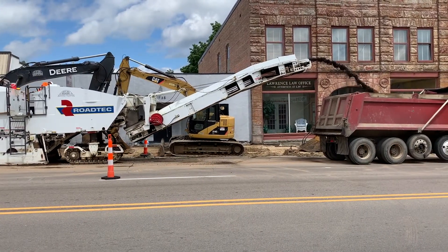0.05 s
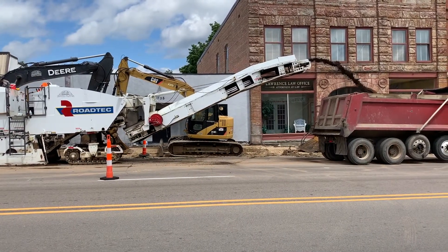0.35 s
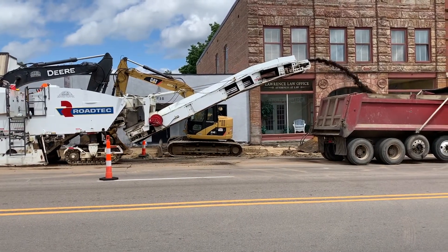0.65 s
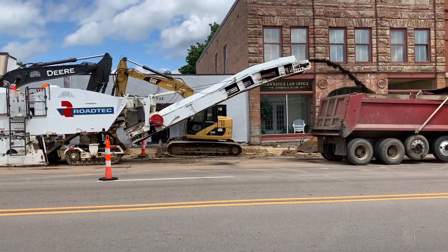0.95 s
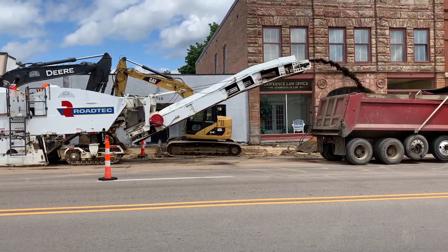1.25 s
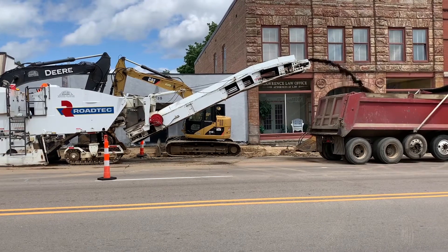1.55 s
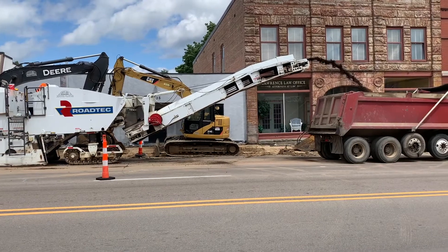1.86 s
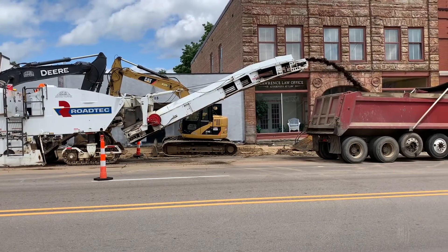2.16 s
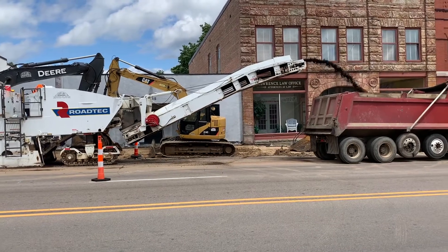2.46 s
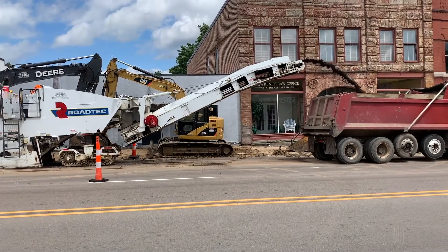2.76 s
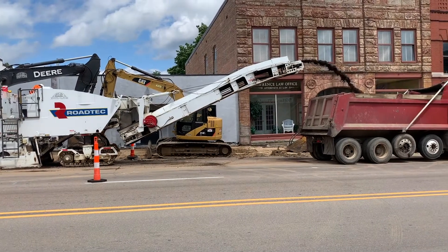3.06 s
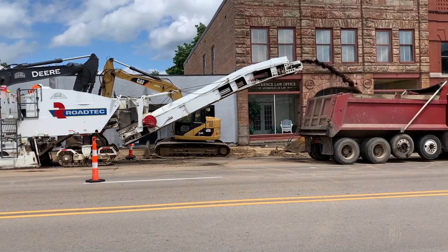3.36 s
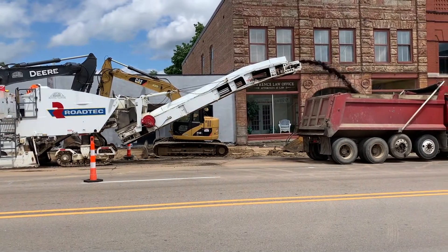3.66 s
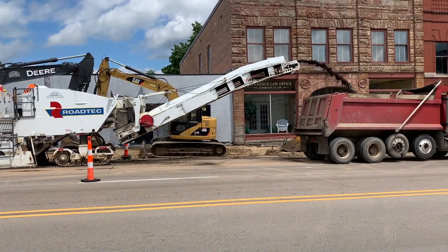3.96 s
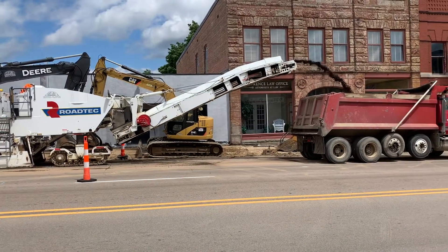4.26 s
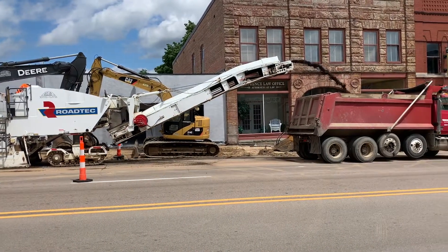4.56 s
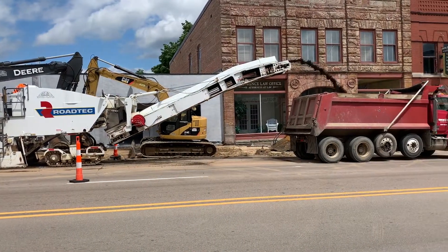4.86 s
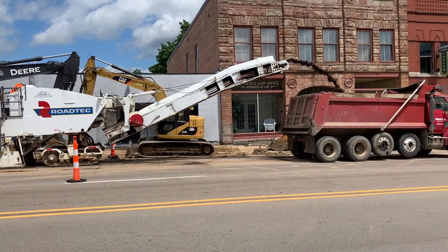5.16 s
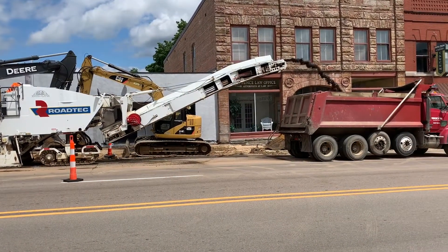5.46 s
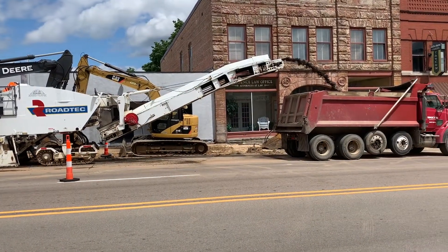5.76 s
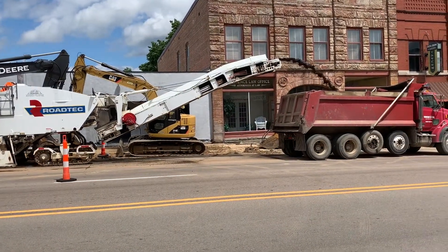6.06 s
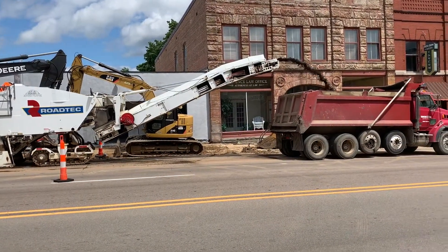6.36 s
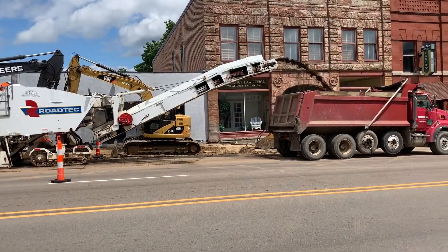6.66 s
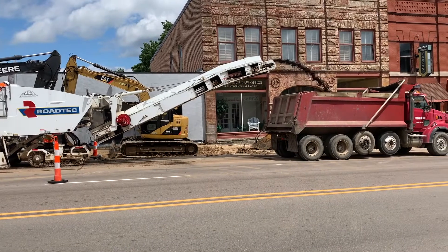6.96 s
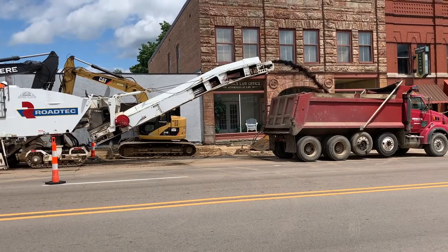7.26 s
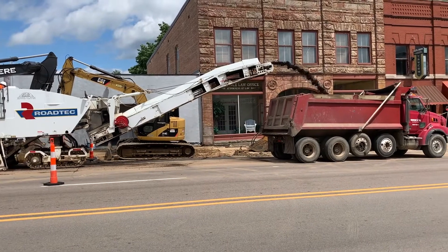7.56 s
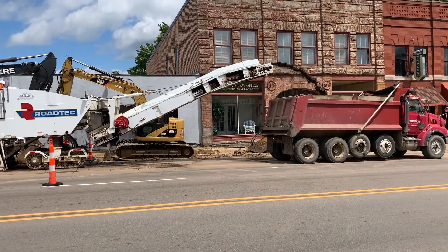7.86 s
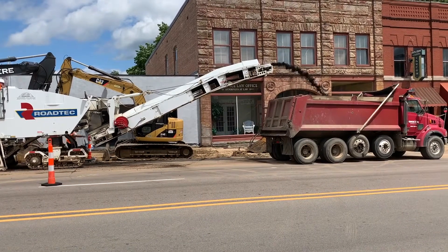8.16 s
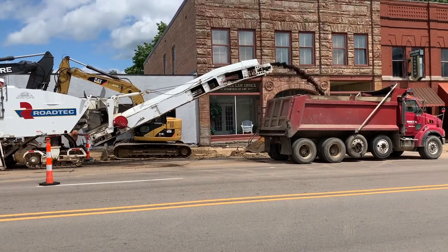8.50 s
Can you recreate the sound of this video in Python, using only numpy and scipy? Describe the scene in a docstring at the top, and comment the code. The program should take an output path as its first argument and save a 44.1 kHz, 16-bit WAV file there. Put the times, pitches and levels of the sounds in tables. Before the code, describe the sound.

A road milling machine grinds asphalt with a loud, steady roar over a droning diesel engine, while grit hisses into a dump truck.

```python
"""A road milling machine creeps along a town street, on the left of a two-port microphone at the far kerb.
Its governed diesel drones in periodic firing pulses, louder under load, over an exhaust rumble. The drum
chips asphalt, countless impacts merging into a roar; slabs thud, steel rings and the crawlers squeak.
On the right, millings pour off the conveyor into a dump truck: a gritty hiss with a few sharp spits."""
import sys
import numpy as np
from scipy import signal
from scipy.fft import rfft, irfft
from scipy.io import wavfile
from scipy.ndimage import uniform_filter1d

SR = 44100
rng = np.random.default_rng(int(sys.argv[2]) if len(sys.argv) > 2 else 0)


def waveform_to_disk(signal):
    """Save audio, clipped to [-1, 1], as 16-bit WAV at the path in sys.argv[1]."""
    frames = np.transpose(np.atleast_2d(signal))
    scaled = np.clip(frames, -1, 1) * 32767
    samples = np.round(scaled).astype(np.int16)
    wavfile.write(sys.argv[1], SR, samples)


N = 384993
TIME, HZ = np.arange(N) / SR, np.fft.rfftfreq(N, 1 / SR)
TURNS_PER_S, FIRINGS_PER_TURN = 36.11, 3  # governed crankshaft
# earlier arrival at the left port: (frequency [Hz], lead [ms])
MACHINE_LEAD = [(300, 0.309), (400, 0.268), (700, 0.292), (1050, 0.213), (1330, 0.362), (1500, 0.302),
                (1800, 0.327), (2200, 0.459), (2900, 0.515), (3500, 0.505), (4500, 0.505), (5000, 0.48),
                (7000, 0.49)]
TRUCK_LEAD_MS = -.217


def diesel(turns, effort_db, firing_db=-20.0, knock_db=-39, order_growth=0.19):
    """Periodic combustion radiates a line spectrum: the firing tone and other orders grow with effort."""
    # engine orders: (multiple of crankshaft speed [1]) and, for each, (level at 0 dB effort [dB])
    multiples = [1.5, 3.5, 5.5, 6, 6.5, 7, 9, 14.5, 19.5, 21, 29, 30, 37.5]
    order_levels = [-39, -37, -41, -35, -35.5, -34, -35, -41.5, -45.5, -45.5, -49, -42.5, -42]
    # pumps, fans and the truck's engine: (frequency [Hz], level [dB])
    hum_lines = [(60.6, -33), (117.1, -30), (172.3, -32), (598.2, -45), (851, -48), (890, -45), (1031, -52),
                 (1361, -50), (1734, -47)]
    firing = tone(FIRINGS_PER_TURN * turns, firing_db + effort_db, waver=0.08)
    orders = sum(tone(k * turns, db, waver=0.17) for k, db in zip(multiples, order_levels))
    orders *= amp(order_growth * effort_db)
    hums = sum(tone(hz * TIME, db, waver=0.3) for hz, db in hum_lines)
    # the knock pattern repeats every two turns
    knock_hz = np.arange(2049) * TURNS_PER_S / 2
    phases = np.exp(2j * np.pi * rng.random(len(knock_hz)))
    cycle = irfft(phases * knock_hz / (1 + (knock_hz / 750) ** 3))
    knock = unit_rms(np.interp(turns / 2 % 1, np.arange(len(cycle)) / len(cycle), cycle))
    drone = firing + orders + hums + amp(knock_db) * knock
    return ports(drone, over_hz(MACHINE_LEAD)) * amp([[-.4], [.4]])


def rumble(boom_db=-1.15, deep_db=-1.0, split_hz=88):
    """Exhaust and vibrating panels radiate low noise: a slowly arching boom over a heaving depth."""
    # rumble spectrum: (frequency [Hz], relative level [dB])
    spectrum = [(20, -68), (35, -58), (53, -38.5), (90, -39), (125, -37.5), (155, -40.5), (200, -40),
                (270, -42), (330, -48), (380, -56.5), (700, -63)]
    # swells of the deep band: (time [s], half length [s], lift [dB])
    heaves = [(1.1, 0.33, 6.5), (1.85, .17, 1.5), (3.0, 1.0, 0.5), (4.473, 0.25, 3), (5.55, .25, 1),
              (6.003, 0.1, 3), (7.15, 0.32, 4), (7.7, .2, 2.5), (8.45, 0.2, 2)]
    noise = coloured(rng.standard_normal((3, N)), spectrum)
    field = fluctuate(street_field(noise), ridge_db=0.63, burst_db=0.9, burst_hz=65, burst_s=.08)
    deep = lowpass(field, split_hz)
    heave_db = sum(db * swell(s, half_s) for s, half_s, db in heaves)
    arch_db = 1.36 * swell(4.2, half_s=5.8)
    return (field - deep) * amp(boom_db + arch_db) + deep * amp(deep_db + heave_db)


def cutting_drum(turns, level_db=-1.15, shake_depth=0.025, surge_db=0.36, rasp_db_per_s=0.14):
    """Dense tooth impacts on asphalt merge into noise that drives the resonances of the steel housing."""
    # grinding spectrum: (frequency [Hz], relative level [dB])
    spectrum = [(150, -73), (420, -50.5), (600, -51.5), (730, -50.5), (900, -52), (1000, -53),
                (1200, -54.5), (1700, -55.5), (2050, -58), (2700, -62.5), (3400, -65), (4400, -67),
                (5200, -72), (6800, -75.5), (12000, -160)]
    # housing modes: (frequency [Hz], bandwidth [Hz], lift [dB])
    modes = [(532, 50, 2.2), (712, 26, 3.5), (758, 18, 2.5), (815, 30, 2), (890, 40, 2.8), (925, 14, 2.5),
             (1085, 20, 3.5), (1385, 80, 2.8), (1700, 110, 2), (1990, 150, 1.8), (2330, 200, 1.5),
             (2570, 80, 2), (3120, 80, 1.2), (3400, 150, 1.8), (3720, 180, 1.6), (4430, 90, 1.5),
             (6760, 200, 3)]
    chips = np.array([impacts(per_s=14000, spread_db=2), *rng.standard_normal((2, N))])
    resonance = amp(sum(db / (1 + (2 * (HZ - hz) / width) ** 2) for hz, width, db in modes))
    noise = irfft(rfft(coloured(chips, spectrum)) * resonance, N)
    field = fluctuate(street_field(noise), ridge_db=1.0, burst_db=1.3, burst_hz=100, burst_s=.035)
    roar = lowpass(field, 1300)
    rasp = bandpass(field, 2200, octaves=0.22)
    rasp_growth = amp(rasp_db_per_s * (TIME - TIME.mean()))
    scrape = field - roar + rasp * (rasp_growth - 1)
    # each firing shakes the housing
    shake = 1 + shake_depth * np.sin(2 * np.pi * FIRINGS_PER_TURN * turns)
    return amp(level_db) * (roar + scrape * amp(surge_db * drift(21.0)) * shake)


def slab_thuds(hz=58, half_s=0.018):
    """Fracture under the drum frees slabs, each radiating a deep pulse of a few cycles."""
    # blows: (time [s], peak level [dB])
    blows = [(0.175, -15), (0.419, -12), (0.646, -11), (0.8, -20), (1.014, -16), (1.723, -13), (3.5, -15),
             (4.08, -16), (4.401, -9.5), (4.68, -16), (6.04, -14), (6.372, -14), (7.03, -11), (8.439, -12),
             (8.57, -11)]
    out = sum(amp(db) * swell(s, half_s) * np.sin(2 * np.pi * (hz * TIME + rng.random()))
              for s, db in blows)
    return ports(out, over_hz(MACHINE_LEAD))


def plate_rattles(t60=0.16, knocks_per_s=70, bout_db=3.0, detuning=.003):
    """Bouts of knocks excite one damped mode in each loose plate; strain shifts its pitch slightly."""
    # plate modes: (frequency [Hz], level [dB])
    plates = [(2032, -43.5), (2155, -49), (2410, -48), (3690, -52), (3770, -50), (4000, -49), (4235, -49.5)]
    t, out = np.arange(SR // 4) / SR, np.zeros(N)
    for hz, db in plates:
        knocks = impacts(knocks_per_s, spread_db=1.5) * amp(bout_db * drift(5))
        phases = np.exp(2j * np.pi * rng.random(N))
        ringing = signal.oaconvolve(knocks * phases, amp(-60 * t / t60))[:N]
        cycles = np.cumsum(hz * (1 + detuning * drift(2))) / SR
        out += amp(db) * unit_rms((ringing * np.exp(2j * np.pi * cycles)).real)
    return ports(out, over_hz(MACHINE_LEAD))


def link_squeaks(level_db=-40.5, spread_db=2.3, length_s=.04, db_per_octave=-4, count=380):
    """Friction in crawler links and conveyor rollers excites brief tones, the high ones weaker."""
    out = np.zeros(N + SR)
    for when, pitch, size, span, glide in rng.random((count, 5)):
        t = np.arange(0, length_s * (.5 + span), 1 / SR)
        octave = 1.25 * pitch
        hz = 1900 * 2 ** octave * (1 + .25 * (glide - .5) * t)
        db = level_db + db_per_octave * octave - spread_db * np.log(size + .03)
        squeak = np.hanning(len(t)) * np.sin(2 * np.pi * np.cumsum(hz) / SR)
        out[int(when * N):][:len(t)] += amp(db) * squeak
    return ports(out[:N], over_hz(MACHINE_LEAD))


def whines_and_squeals():
    """Narrow-band vibration swells and fades as a drive whines, single engine orders swell and the crawler
    binds."""
    # drive whine near 900 Hz and swelling engine orders: (time [s], half length [s], frequency [Hz], level
    # [dB], width [Hz])
    swells = [(3.7, 0.77, 897, -35, 12), (5.9, 1.3, 326.2, -34, 2), (7.35, 0.38, 252.5, -27, 12),
              (8.3, 0.32, 721, -33, 4.7)]
    # crawler: (time [s], half length [s], frequency [Hz], level [dB])
    squeals = [(6.74, .025, 3840, -36.5), (6.80, .025, 4400, -41), (6.873, .02, 4520, -41),
               (6.928, .02, 4330, -36), (6.946, .025, 3850, -36), (7.12, .04, 3640, -38),
               (7.09, .05, 3800, -42)]
    swelling = sum(narrow_band(*row) for row in swells)
    crawler = sum(narrow_band(*row, width_hz=75) for row in squeals)
    return ports(swelling + crawler, over_hz(MACHINE_LEAD))


def stone_clinks(t60=0.2, rise_s=.001, mode_ratio=1.06, upper_db=-4):
    """A stone striking the machine's steel sets two close modes into damped free vibration."""
    # strikes: (time [s], level [dB], lower mode [Hz])
    strikes = [(0.66, -32, 3110), (0.99, -31, 4130), (1.088, -30, 2070), (2.126, -26, 2580),
               (4.45, -30, 3160), (4.582, -33, 4000), (4.904, -32, 2120), (5.254, -33, 4130),
               (5.64, -28, 3170), (5.926, -36, 4130), (6.286, -25, 2100), (6.645, -31, 3530),
               (7.185, -35, 3750), (7.525, -27, 1990), (8.071, -31, 4005), (8.462, -31, 3620)]
    t, out = np.arange(SR // 4) / SR, np.zeros(N + SR)
    for s, db, hz in strikes:
        lower = np.sin(2 * np.pi * hz * t)
        upper = amp(upper_db) * np.sin(2 * np.pi * (mode_ratio * hz * t + rng.random()))
        envelope = (1 - np.exp(-t / rise_s)) * amp(db - 60 * t / t60)
        out[round(s * SR):][:len(t)] += (lower + upper) * envelope
    return ports(out[:N], over_hz(MACHINE_LEAD))


def millings(level_db=-1.65, clump_db=0.14, scatter_db=-8):
    """Crumbs raining into the truck make shot noise whose level follows the conveyor's uneven flow."""
    # pouring spectrum: (frequency [Hz], relative level [dB])
    spectrum = [(1500, -81), (3000, -80), (5000, -75.5), (7200, -75.5), (8500, -73), (10800, -78.5),
                (13000, -84.5), (15000, -83)]
    # conveyor delivery, taken about its mean: (time [s], level [dB])
    delivery = [(0.0, -41.5), (0.19, -42), (2.41, -42), (2.67, -42), (2.99, -43), (3.87, -42.5),
                (6.81, -43), (7.29, -44.5), (8.73, -43.5)]
    crumbs = coloured(impacts(per_s=14000, spread_db=-2.0), spectrum)
    scattered = coloured(rng.standard_normal((2, N)), spectrum)
    flow_db = over_time(delivery)
    flow = amp(level_db + flow_db - flow_db.mean() + clump_db * drift(17))
    stream = ports(crumbs, TRUCK_LEAD_MS) + amp(scatter_db) * scattered
    return fluctuate(stream, ridge_db=1.3, burst_db=2.0, burst_hz=140, burst_s=.035) * flow


def grit_spits(rise_s=0.0002, crack_s=0.0018, bounce_s=.0045, bounce_db=4, crackle_db=0.8, body_db=-1):
    """Grit hits the truck in a transient: a crack, a rebound, then an exponentially decaying crackle."""
    # sprays: (time [s], relative level [dB], t60 [s], centre [Hz], crack lift [dB])
    sprays = [(0.1082, -31, 0.098, 8930, 9), (0.2177, -29, 0.099, 10600, 9), (0.654, -22.5, 0.11, 9900, 8),
              (0.9844, -30, 0.08, 8380, 3), (1.746, -28.5, 0.15, 9500, 8), (1.9485, -30, 0.12, 8590, 4),
              (2.4808, -34, 0.32, 8950, 1), (3.8846, -32, 0.043, 9460, 4), (4.3132, -25, 0.15, 9500, 9),
              (4.685, -38, .12, 13200, 1), (4.8643, -24.5, 0.12, 10100, 2), (5.1372, -29, 0.1, 8780, 6),
              (5.1542, -28, 0.26, 9260, 10), (5.1605, -31, .06, 9500, 6), (5.1795, -31, .05, 9300, 9),
              (5.3063, -33, 0.27, 8630, 3), (6.099, -31, 0.08, 9500, 4), (6.1504, -28.5, 0.17, 10600, 11),
              (8.0212, -37, 0.19, 9260, 6), (8.1773, -36, 0.08, 9320, 4)]
    t, out = np.arange(SR // 3) / SR, np.zeros(N + SR)
    rebound_db = bounce_db * (t > bounce_s) * np.exp(-abs(t - bounce_s) / crack_s)
    for s, db, t60, centre_hz, crack_db in sprays:
        hiss = unit_rms(bandpass(rng.standard_normal(len(t)), centre_hz, octaves=0.39, steepness=2.5))
        crackle = unit_rms(uniform_filter1d(rng.standard_normal(len(t)), size=90))
        decay_db = body_db + crack_db * np.exp(-(t / crack_s) ** 2) + rebound_db - 60 * t / t60
        envelope = (1 - np.exp(-t / rise_s)) * amp(db + decay_db + crackle_db * crackle)
        out[round(s * SR):][:len(t)] += hiss * envelope
    return ports(out[:N], TRUCK_LEAD_MS)


def lump_scrapes():
    """Sliding friction of asphalt lumps on steel gives short swells of band noise."""
    # slides: (time [s], level [dB], half length [s], centre [Hz], half width [octaves])
    slides = [(1.013, -37, 0.025, 4600, .7), (1.785, -28, 0.015, 2850, .3), (1.957, -27, 0.011, 3150, .3),
              (1.96, -32, .014, 6000, .8), (3.88, -37, .04, 5000, 1), (4.32, -35, 0.02, 7000, .4),
              (4.556, -37.5, .35, 3550, .2), (5.165, -32.5, .022, 6800, .5), (6.9, -35.5, 0.2, 3530, .3)]
    out = np.zeros(N)
    for s, db, half_s, centre_hz, octaves in slides:
        near = np.flatnonzero(abs(TIME - s) < 3 * half_s)
        noise = unit_rms(bandpass(rng.standard_normal(len(near)), centre_hz, octaves))
        out[near] += noise * amp(db) * swell(s, half_s)[near]
    return ports(out, TRUCK_LEAD_MS)


def pebbles(per_s=30, level_db=-54, t60=0.046):
    """Sparse impacts of stones on the load are heard singly, as damped ticks."""
    t = np.arange(SR // 8) / SR
    tick = rng.standard_normal(len(t)) * amp(-60 * t / t60)
    patter = signal.oaconvolve(impacts(per_s, spread_db=4.5), tick)[:N]
    return amp(level_db) * ports(unit_rms(bandpass(patter, 9500, octaves=.5)), TRUCK_LEAD_MS)


def ports(x, lead_ms):
    """A path difference brings sound to the left port lead_ms before the right."""
    shift = np.exp(1j * np.pi * HZ * lead_ms / 1000)
    return irfft(rfft(x) * np.array([shift, 1 / shift]), N)


def street_field(noise):
    """Direct sound (row 0) and street scatter (rows 1, 2) sum to a partly coherent field at the ports."""
    # likeness of the ports: (frequency [Hz], coherence [0-1])
    coherence = [(30, 0.4), (70, 0.61), (130, 0.88), (400, 0.66), (750, 0.74), (1100, 0.81), (1400, 0.56),
                 (1750, 0.85), (2030, 0.67), (2300, 0.34), (2600, 0.53), (3080, 0.72), (3450, 0.89),
                 (4200, 0.39), (5200, 0.15), (7000, 0.13)]
    # level difference: (frequency [Hz], left minus right [dB])
    balance = [(60, 0.5), (140, -1), (260, -2), (500, 0), (770, 2.5), (1170, 0.5), (1700, -2), (2700, 2.5),
               (3500, -2), (4400, -1.5), (6300, -2.5), (8000, 1)]
    share = np.clip(over_hz(coherence), .02, .98)
    direct = np.sqrt(share) * rfft(ports(noise[0], over_hz(MACHINE_LEAD)))
    scattered = np.sqrt(1 - share) * rfft(noise[1:])
    return irfft((direct + scattered) * amp(over_hz(balance) * np.array([[.5], [-.5]])), N)


def fluctuate(x, ridge_db, burst_db, burst_hz, burst_s):
    """Narrow resonances come and go as the machine creeps on; wider bands flare as lumps strike."""
    frames = signal.stft(x, nperseg=2048, noverlap=1536)[2]
    ridges = ridge_db * patches(frames.shape[1:], wide_hz=45, long_s=2.5)
    bursts = burst_db * patches(frames.shape[1:], burst_hz, burst_s)
    return signal.istft(frames * unit_rms(amp(ridges + bursts)), nperseg=2048, noverlap=1536)[1][:, :N]


def patches(shape, wide_hz, long_s):
    """Smoothing correlates a random (bins, frames) field over about this width and length."""
    field = rng.standard_normal(shape)
    for axis, size in enumerate([wide_hz * 2048 / SR, long_s * SR / 512]):
        for _ in range(2):
            field = uniform_filter1d(field, max(round(size), 1), axis)
    return unit_rms(field)


def tone(cycles, db, waver):
    """Propagation in open air slowly modulates a tone's amplitude and phase."""
    carrier = np.exp(2j * np.pi * (cycles + rng.random()))
    wander = drift(1.2) + 1j * drift(1.2)
    return np.sqrt(2) * amp(db) * (carrier * (1 + waver * wander)).real


def narrow_band(s, half_s, hz, db, width_hz):
    """Random modulation broadens a swelling tone into a band."""
    modulation = drift(width_hz) + 1j * drift(width_hz)
    return amp(db) * swell(s, half_s) * unit_rms((np.exp(2j * np.pi * hz * TIME) * modulation).real)


def impacts(per_s, spread_db):
    """A Poisson train of impulses of uneven size, rms 1."""
    size = amp(spread_db * np.minimum(rng.exponential(1, N), 4))
    return unit_rms(size * rng.standard_normal(N) * (rng.random(N) < per_s / SR))


def drift(hz):
    """Random fluctuation below about hz, rms 1."""
    return unit_rms(irfft(rfft(rng.standard_normal(N)) / (1 + (HZ / hz) ** 4), N))


def swell(s, half_s):
    """A Gaussian envelope peaking at time s."""
    return np.exp(-np.minimum(((TIME - s) / half_s) ** 2, 50))


def coloured(x, spectrum):
    """Shapes white noise to a spectral density that rolls off past the table's ends."""
    low_cut = 1 + (.8 * spectrum[0][0] / (HZ + 1)) ** 8
    high_cut = (1 + (HZ / spectrum[-1][0]) ** 40) ** .25
    return irfft(rfft(x) * amp(over_hz(spectrum)) / low_cut / high_cut * np.sqrt(SR / 2), N)


def lowpass(x, hz):
    """Zero-phase filter falling 36 dB an octave above hz."""
    return irfft(rfft(x) / (1 + (HZ / hz) ** 6), N)


def bandpass(x, centre_hz, octaves, steepness=4):
    """Zero-phase filter with a half width in octaves."""
    n = x.shape[-1]
    hz = np.fft.rfftfreq(n, 1 / SR) + 1
    return irfft(rfft(x) / (1 + abs(np.log2(hz / centre_hz) / octaves) ** steepness), n)


def over_hz(points):
    """Interpolates a table in log frequency."""
    hz, value = np.transpose(points)
    return np.interp(np.log(HZ + 1), np.log(hz + 1), value)


def over_time(points):
    """Interpolates a table at every sample."""
    return np.interp(TIME, *np.transpose(points))


def amp(db):
    """Decibels to amplitude ratio."""
    return 10 ** (np.asarray(db) / 20)


def unit_rms(x):
    """Scales to rms 1."""
    return x / np.sqrt(np.mean(x ** 2) + 1e-20)


def scene():
    """Superposition of the machine on the left and the truck on the right."""
    # load on the diesel: (time [s], effort [dB])
    load = [(0.0, -4.5), (2.5, -2), (3.3, 0.9), (4.7, -1.0), (6.7, 1.8), (7.25, -3.5), (8.1, 2), (8.73, 3)]
    effort_db = over_time(load)
    turns = np.cumsum(TURNS_PER_S - .025 * effort_db) / SR  # the governed speed sags a little under load
    machine = diesel(turns, effort_db) + rumble() + cutting_drum(turns) + slab_thuds()
    steel = plate_rattles() + link_squeaks() + whines_and_squeals() + stone_clinks()
    truck = millings() + grit_spits() + lump_scrapes() + pebbles()
    return machine + steel + truck


def record(dry, knee=.65, headroom=.3, cutoff_hz=15400):
    """Soft saturation rounds the tallest peaks, then a low-pass filter limits the band."""
    linear = np.clip(dry, -knee, knee)
    rounded = linear + headroom * np.tanh((dry - linear) / headroom)
    taps = signal.firwin(401, cutoff_hz, window=("kaiser", 9), fs=SR)
    return signal.oaconvolve(rounded, taps[None], "same")


dry = scene()
out = record(dry)
waveform_to_disk(out)
```